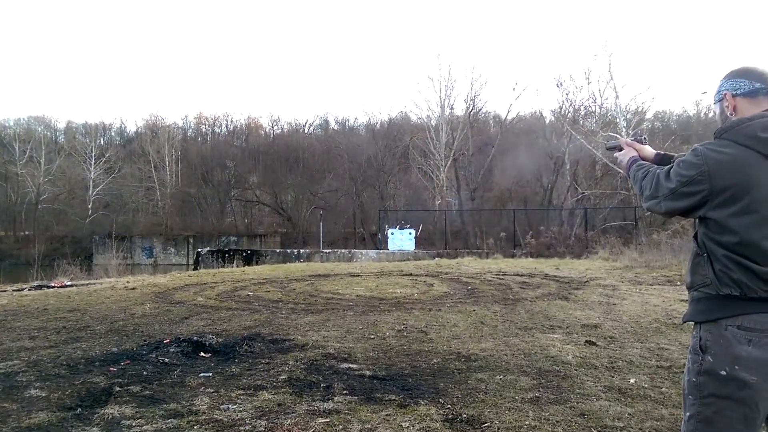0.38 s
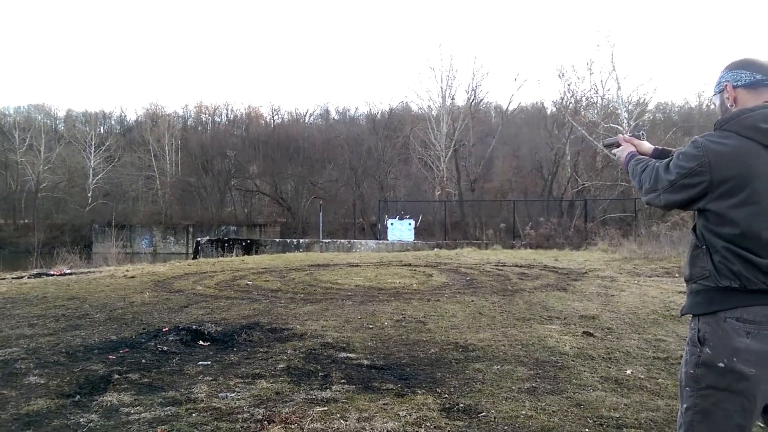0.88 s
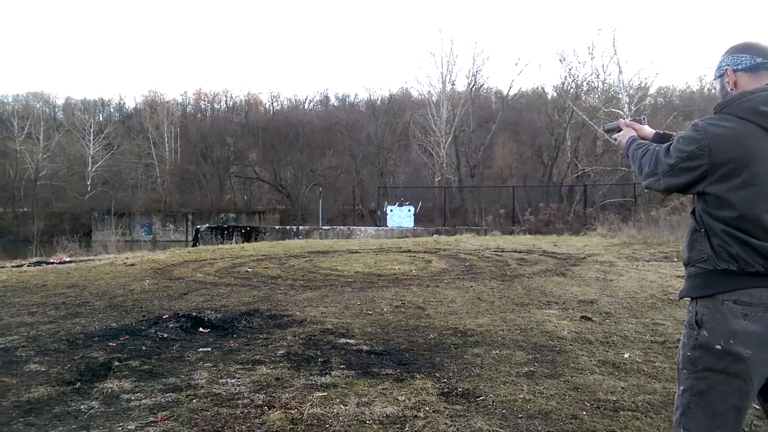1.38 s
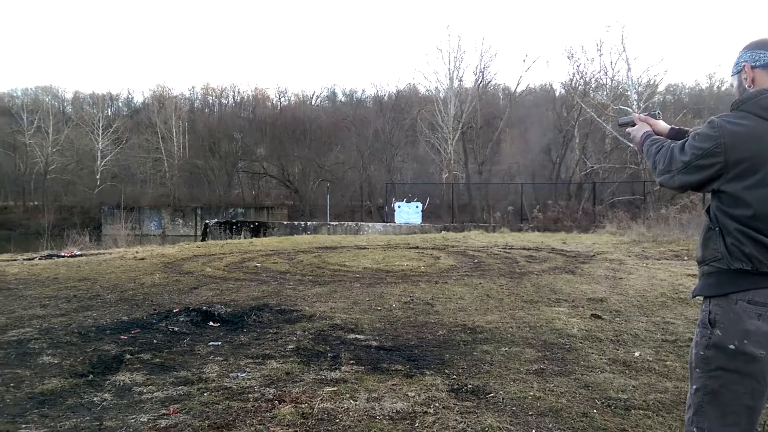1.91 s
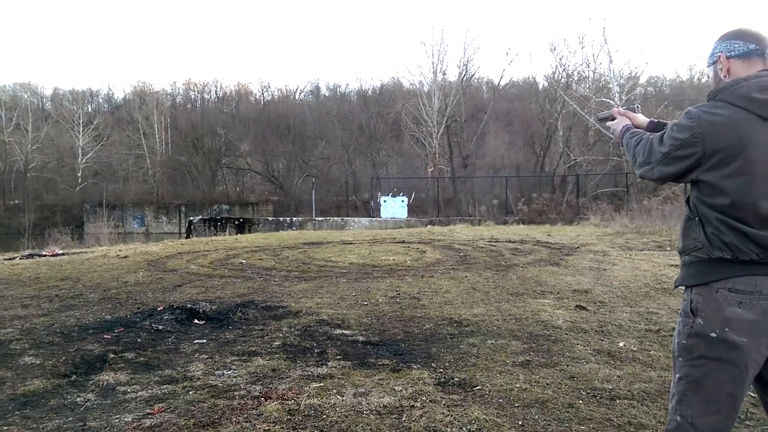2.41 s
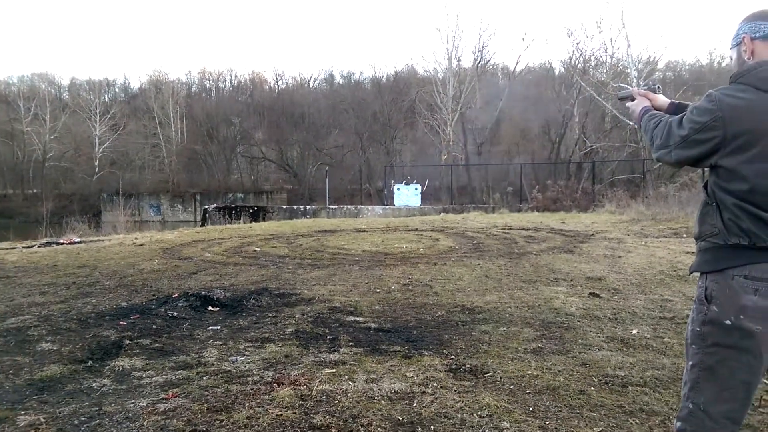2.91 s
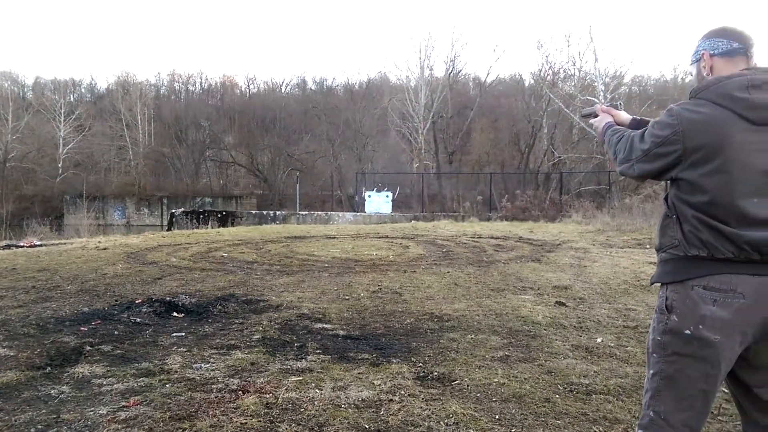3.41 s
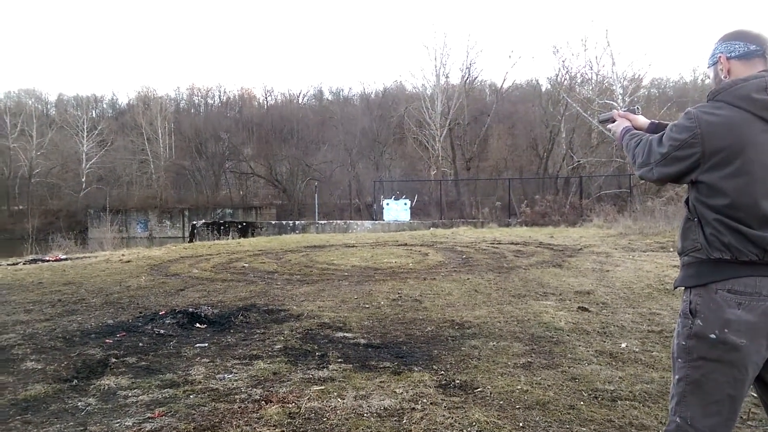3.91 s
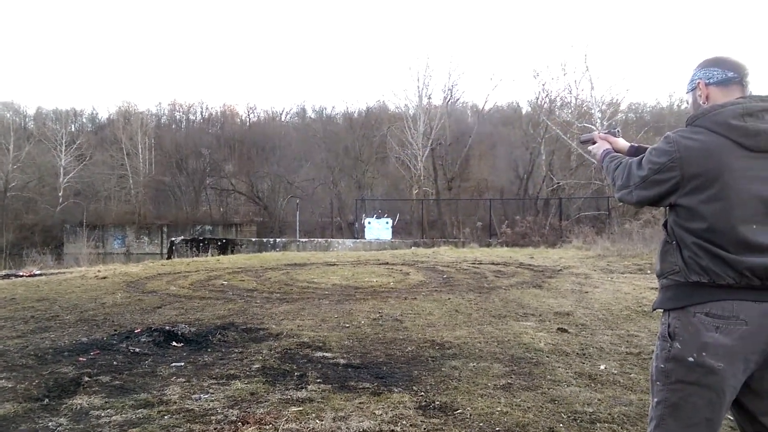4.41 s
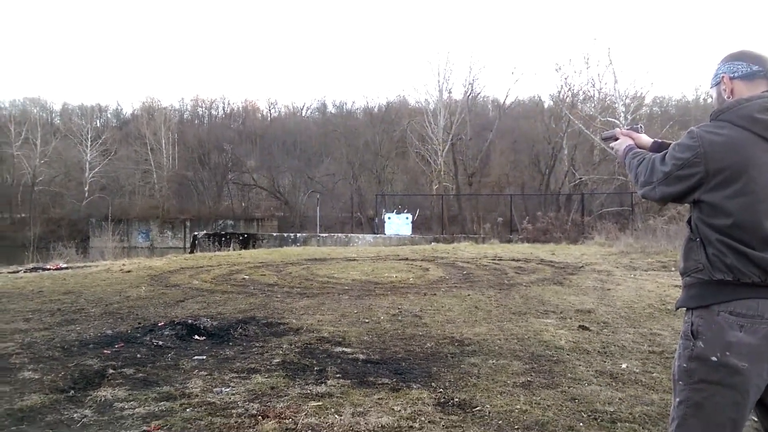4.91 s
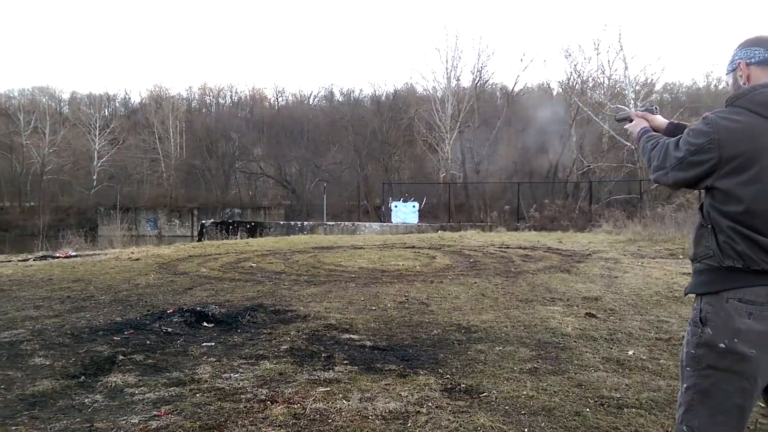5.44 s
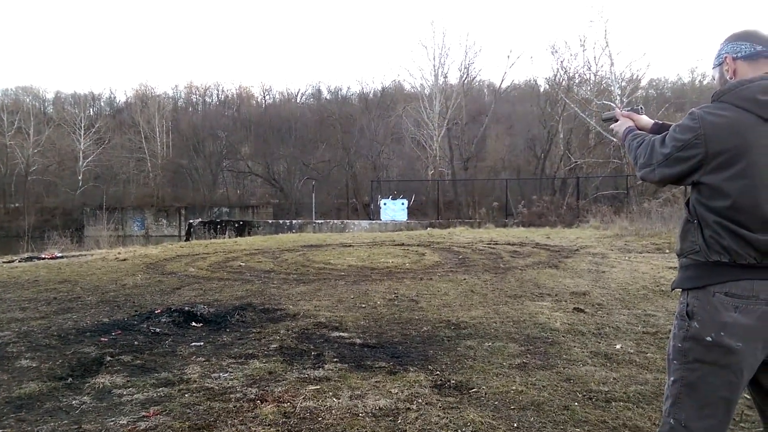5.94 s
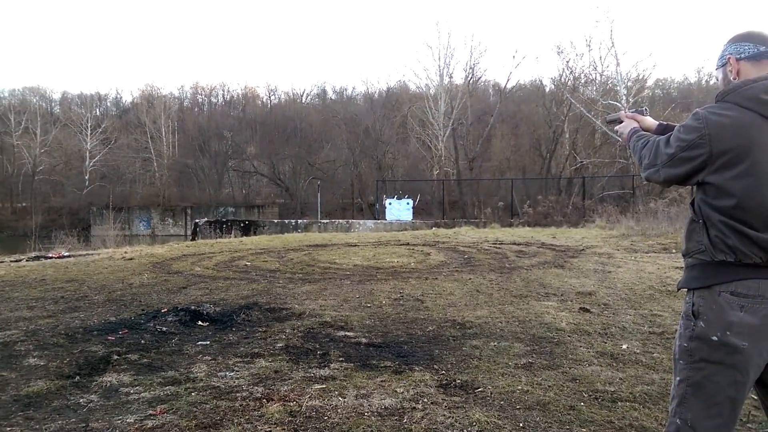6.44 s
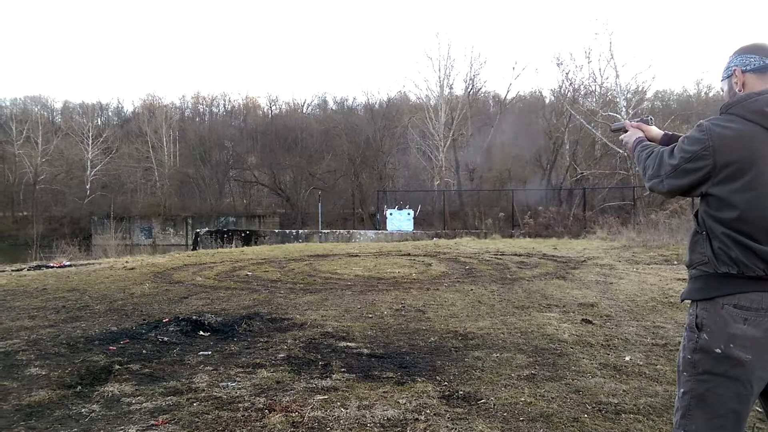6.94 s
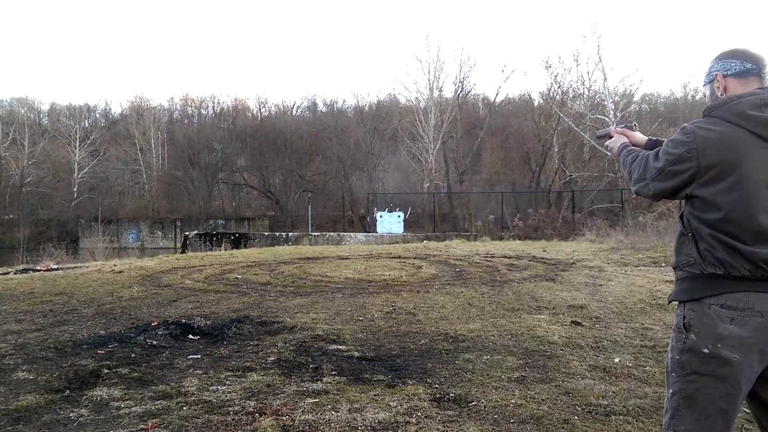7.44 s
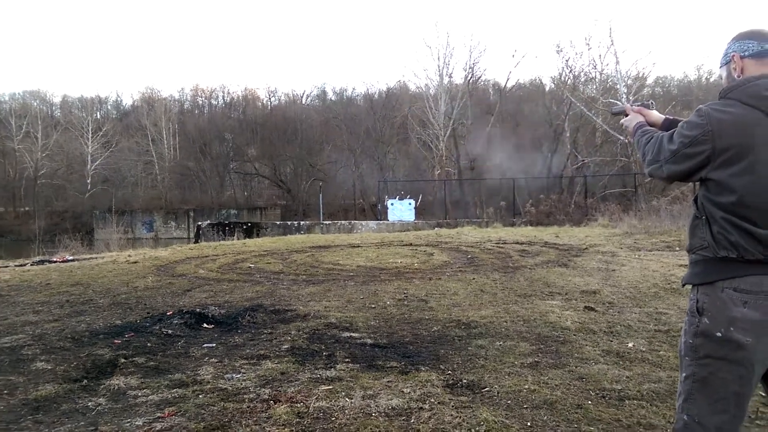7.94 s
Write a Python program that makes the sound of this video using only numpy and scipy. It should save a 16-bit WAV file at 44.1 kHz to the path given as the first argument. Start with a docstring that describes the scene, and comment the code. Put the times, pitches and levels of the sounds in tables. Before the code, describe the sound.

Seven evenly spaced handgun shots crack over a grassy field, each with sharp slapback echoes and a fading tree-line wash, above a low engine throb.

```python
"""A small engine throbs to the left over the rustle of an open field, and a handgun's parts faintly ring and click.
Then come seven shots, each a pressure jump with boom and rattle that drives the microphones into overload.
Sharp slaps return from sheds, fence and banks, within a wash scattered by ground and trees that loses its treble.
Struck metal rings, cases knock and clink as they land, and dull thumps come from the ground.
The gain control ducks under each blast, then climbs back so that the throb swells again."""
import sys
import numpy as np
from scipy import signal
from scipy.io import wavfile

SR = 44100
rng = np.random.default_rng(int(sys.argv[2]) if len(sys.argv) > 2 else 0)


def file_out(sig):
    """Save sig as 16-bit WAV at sys.argv[1]."""
    # one column per channel
    cols = np.atleast_2d(sig).T
    # limit, then scale
    lim = np.clip(cols, -1, 1)
    pcm = np.round(lim * 32767).astype(np.int16)
    wavfile.write(sys.argv[1], SR, pcm)


def invert_db(level):
    """Linear amplitude ratio for a level in decibels (20 dB per decade), elementwise."""
    return 10 ** (np.asarray(level, dtype=float) / 20)


N = 356328   # samples

BAND_EDGES_HZ = 33 * 2 ** np.arange(0, 9.6, .5)
BANDS_HZ = list(zip(BAND_EDGES_HZ, BAND_EDGES_HZ[1:]))   # half-octave bands: low, high


def at_hz(points, hz):
    """Spectral interpolation: a curve is read on a log-frequency axis."""
    points_hz, values = np.transpose(points)
    return np.interp(np.log(hz), np.log(points_hz), values)


def band(x, low_hz, high_hz):
    """Band limitation: a Butterworth filter passes one range of frequencies."""
    edges = np.clip([low_hz, high_hz], 10, .45 * SR)
    return signal.sosfilt(signal.butter(2, edges, "band", fs=SR, output="sos"), x + 1e-18)


def drift(rate_hz):
    """Random modulation: straight lines join random knots of unit spread."""
    knots = rng.standard_normal(int(rate_hz * N / SR) + 2)
    return np.interp(np.arange(N) * rate_hz / SR, np.arange(len(knots)), knots)


def ring(clicks, hz, t60_s):
    """Damped resonance: a unit click starts a decaying sine of initial height 1."""
    r = invert_db(-60 / (t60_s * SR))
    w = 2 * np.pi * hz / SR
    return signal.lfilter([0, np.sin(w)], [1, -2 * r * np.cos(w), r * r], clicks + 1e-18)


def add(out, x, start_s):
    """Superposition: x is summed into out from its start on."""
    i = min(round(start_s * SR), N)
    out[:, i:i + x.shape[-1]] += x[..., :N - i]


# likeness of left and right in the sound field: pitch_hz, likeness (0 to 1)
CHANNEL_LIKENESS = [(60, 0.37), (130, 0.95), (300, 1), (700, 0.067), (1500, 0.71), (4000, 0.033),
                    (9000, 0.024)]


def stereo(pair, hz):
    """Spatial coherence: sum and difference of two noises set how alike the channels are."""
    alike = np.clip(at_hz(CHANNEL_LIKENESS, hz), 0, 1)
    return np.sqrt(.5 + .5 * alike) * pair[0] + np.sqrt(.5 - .5 * alike) * pair[1] * [[1], [-1]]


FAR_LAG, NEAR_LAG = 16, 11   # samples by which right trails left; near: the blast and its slaps


def from_left(x, lag=FAR_LAG):
    """Interaural-style time difference: the right channel hears the sound late."""
    return np.array([x[0], np.roll(x[1], lag)])


def puff(hz, level_db, pan_db, t60_s, octaves):
    """Impulsive noise: a decaying burst, steeply limited to some octaves either side of hz."""
    t = np.arange(4000) / SR
    burst = rng.standard_normal((2, len(t))) * invert_db(-60 * t / t60_s)
    low, high = hz / 2 ** octaves, hz * 2 ** octaves
    partly_alike = burst[0] + .5 * burst
    burst = band(band(partly_alike, low, high), low, high)
    return burst / abs(burst).max() * invert_db(level_db + np.array([[.5], [-.5]]) * pan_db)


# shots: start_s, level_db (peak of the rattle), hold_s (before its extra fade),
# bass_db (bass of the blast), metal_db (drive of the struck metal)
GUNSHOTS = [(0.1999, 17.5, 0.025, -1.5, -2.5), (1.5166, 28, 0.026, -0.5, -35),
            (2.7072, 26, 0.028, -2.5, -5), (4.0067, 27, 0.031, -1.5, -34), (5.438, 19, 0.0012, -13, -2),
            (6.6921, 25, 0.03, -2, -7.5), (7.8357, 22, 0.029, -2, -29)]
# spectrum of the rattle before the bass setting: pitch_hz, level_db (relative, per Hz)
RATTLE_COLOUR = [(150, -20), (230, -11), (320, -13), (420, -3), (550, -8), (1000, -2.5), (1600, -10),
                 (2600, -8), (4000, -14), (8000, -19), (16000, -18.5)]
# resonances left booming: pitch_hz, level_db (relative), t60_s
BOOM_MODES = [(320, -8, 0.12), (516, -9, 0.091), (800, -18, 0.037), (1000, -3, 0.077), (2460, -10, 0.037)]


def blasts():
    """Shock radiation: an N-shaped jump, ringing boom modes and a rattle of gas, slide and nearest ground."""
    out = np.zeros((2, N))
    t = np.arange(SR // 4) / SR
    jump = np.clip(1 - t / 0.0004, -1, 1) * (t < .0016)
    boom = sum(invert_db(db) * ring(t == 0, hz, t60_s) for hz, db, t60_s in BOOM_MODES)
    for start_s, level_db, hold_s, bass_db, _ in GUNSHOTS:
        extra_t60_s = 2.2 * hold_s
        # a steady fade of 606 dB per s, joined after the hold by the extra one
        fade_db = -60 * np.maximum(t - hold_s, 0) / extra_t60_s - 606 * t
        noise = rng.standard_normal((2, 2, len(t))) * invert_db(fade_db)
        rattle = 0
        for k, (low, high) in enumerate(BANDS_HZ[4:]):
            colour_db = at_hz(RATTLE_COLOUR, low * 1.194) + bass_db / (1 + (low / 1500) ** 2)
            pair = stereo(noise[k % 2], low / 2.5)   # near, so more alike
            rattle = rattle + invert_db(colour_db) * band(pair, low, high)
        blast = rattle / abs(rattle).max() + invert_db(-21.5) * jump + invert_db(2 * bass_db - 11) * boom
        add(out, from_left(invert_db(level_db) * blast, NEAR_LAG), start_s)
    return out


# single reflectors: delay_s, level_db (peak before panning), pitch_hz (centre), pan_db (left minus right)
REFLECTORS = [(.056, 6.5, 800, -10.5), (.0673, 5, 2700, -13), (.1455, -3, 330, -2.5), (0.1459, 3, 1490, -1),
              (.194, -8, 800, 3), (.21, -14.5, 885, 5), (.2322, -5, 880, -9), (.2464, -4, 890, 0.5),
              (.285, -6.5, 730, -5), (.298, -16, 835, -2), (.4413, -16.5, 2270, -8), (.5664, -16, 700, 0.5),
              (.7004, -20, 2620, 2)]


def slaps():
    """Specular reflection: sheds, fence and banks return one pattern of bursts, varying a little in level."""
    out = np.zeros((2, N))
    # a hard face throws the sharpest slap, which flutters twice more, drifting left
    flutter = [(.1045 + k * .0082, 19 - k * 9.5, 2970, 7 + k * 9) for k in range(3)]
    for delay_s, level_db, hz, pan_db in flutter + REFLECTORS:
        # 11.4 cycles of decay; far reflectors are wide and rough, adding .17 s per s past .15 s
        t60_s = 11.4 / hz + .17 * max(delay_s - .15, 0)
        octaves = .55 + np.exp(-delay_s / .2)   # far slaps are narrower in band
        slap = from_left(puff(hz, level_db, pan_db, t60_s, octaves), NEAR_LAG)
        for start_s, *_ in GUNSHOTS:
            add(out, slap * invert_db(rng.normal(0, 1.5)), start_s + delay_s)
    return out


# wash from ground and trees, nearest first: delay_s, level_db (relative),
# pan_db (left minus right, in the treble)
SCATTER = [(0, -12, 0), (.035, -7.5, 3), (.058, -0.5, -9), (.078, -6, -8), (.1, -0.5, -0.5),
           (.1435, -15.5, -23), (.146, -0.5, 1.5), (.2, -12.5, -10), (.25, -11.5, -5), (.42, -19, -8),
           (.57, -19.5, 1.5), (.64, -24, 1.5), (.86, -23, -1), (1.6, -44, -4)]
# spectrum of the wash: pitch_hz, level_db (relative, per Hz)
SCATTER_COLOUR = [(88, -43.5), (150, -8.5), (254, -13), (321, -11.5), (637, -4), (998, 1), (1260, -6),
                  (2140, -6), (4760, -11), (5360, -18.5), (6770, -26), (14500, -23), (16000, -22.5)]
# absorption along the path: pitch_hz, loss_db_per_s
AIR_ABSORPTION = [(200, -10.5), (700, 0.5), (2500, 0.5), (4500, 24.5), (7000, 90), (11000, 54),
                  (16000, 115)]


def wash():
    """Diffuse scattering: countless trunks return a mostly repeated pattern, its treble absorbed by the air."""
    same, grain_db, roll_db = .75, 2.0, 1.7   # power share repeated; clumping; unevenness within each band
    delay_s = np.arange(round(SCATTER[-1][0] * SR)) / SR
    points_s, points_db, points_pan_db = np.transpose(SCATTER)
    level_db = np.interp(delay_s, points_s, points_db)
    pan_db = np.interp(delay_s, points_s, points_pan_db)
    clumps = invert_db(grain_db * drift(150)[:len(delay_s)])
    trunks = rng.standard_normal((2, 2, len(delay_s)))
    leaves = rng.standard_normal((len(GUNSHOTS), 2, 2, len(delay_s)))   # the air shifts between shots
    echoes = clumps * (np.sqrt(same) * trunks + np.sqrt(1 - same) * leaves)
    out = 0
    for k, (low, high) in enumerate(BANDS_HZ[4:]):
        hz = np.sqrt(low * high)
        scattered = np.zeros((2, N))
        shade = np.clip(np.log2(hz / 500) / 2.35, 0, 1)   # the housing shades only short waves
        gain_db = level_db - 35 + at_hz(SCATTER_COLOUR, hz) - at_hz(AIR_ABSORPTION, hz) * (delay_s - .2)
        gain_db = gain_db + roll_db * drift(24.67)[:len(delay_s)]
        gain = invert_db(gain_db + np.array([[.5], [-.5]]) * shade * pan_db) * np.sqrt(SR / 2)
        for (start_s, *_), echo in zip(GUNSHOTS, echoes):
            add(scattered, gain * stereo(echo[k % 2], hz), start_s)
        out = out + band(scattered, low, high)
    return from_left(out)


# modes of the metal: pitch_hz, level_db (relative to the drive), t60_s
METAL_MODES = [(2200, -18, .8), (3570, -14, .6), (5200, -16, .5), (5350, -17, .45)]


def struck_metal():
    """Modal vibration: metal downrange rings .155 s after each shot, and the air makes it waver."""
    hits = np.zeros((1, N))
    for start_s, *_, metal_db in GUNSHOTS:
        add(hits, np.array([[invert_db(metal_db)]]), start_s + .155)
    return sum(invert_db(db) * (.4 + drift(160)) * ring(hits, hz, t60_s) for hz, db, t60_s in METAL_MODES)


# cases knock on cloth and grass: start_s, level_db (peak before panning), pan_db (left minus right)
CASE_KNOCKS = [(0.6624, -22.5, 11), (0.8984, -43, 2.5), (1.9116, -23, 6), (2.2159, -39, 2),
               (2.2762, -37, 1.0), (3.213, -23.5, 10), (3.4062, -34, 3.5), (4.3779, -22.5, 4),
               (5.889, -21.5, 7), (7.0595, -23, 9), (7.1965, -42, 1.0)]


def case_knocks():
    """Damped impact: each case on a soft surface makes a brief puff of treble noise."""
    out = np.zeros((2, N))
    for start_s, level_db, pan_db in CASE_KNOCKS:
        add(out, puff(9200, level_db, pan_db, t60_s=.022, octaves=1.0), start_s)
    return out


# a case strikes something hard: start_s, level_db (drive of the modes)
CASE_CLINKS = [(1.0001, -37), (1.1503, -34.5)]
# modes of a case landing end on: pitch_hz, level_db (relative to the drive), t60_s
CASE_MODES = [(10930, -1, 0.12), (11620, -4, 0.18)]


def case_clinks():
    """Modal vibration: a hard impact sets the modes of a case ringing."""
    drops = np.zeros(N)
    for start_s, level_db in CASE_CLINKS:
        drops[round(start_s * SR)] = invert_db(level_db)
    return sum(invert_db(db) * ring(drops, hz, t60_s) for hz, db, t60_s in CASE_MODES)


# dull thumps from the ground: start_s, level_db (peak)
GROUND_THUMPS = [(2.276, -9), (3.592, -22), (4.738, -9), (6.321, -33)]


def ground_thumps():
    """Damped impact: the ground answers with short, low bursts of noise."""
    out = np.zeros((2, N))
    for start_s, level_db in GROUND_THUMPS:
        add(out, puff(380, level_db, 0, t60_s=.014, octaves=1.3), start_s)
    return out


# clicks of handling the gun: start_s, level_db (peak before panning), pan_db (left minus right)
GUN_CLICKS = [(0.145, -34, 1), (1.3194, -44, 0.0), (7.814, -40, 0.0)]
# one faint ring of the gun's parts: start_s, level_db, pitch_hz, t60_s
GUN_RING = (.118, -43, 2230, .6)


def gun_handling():
    """Impact excitation: the gun's parts click as noise puffs, and one rings as a damped resonance."""
    out = np.zeros((2, N))
    for start_s, level_db, pan_db in GUN_CLICKS:
        add(out, puff(3000, level_db, pan_db, t60_s=.022, octaves=1.0), start_s)
    start_s, level_db, hz, t60_s = GUN_RING
    return out + ring(invert_db(level_db) * (np.arange(N) == round(start_s * SR)), hz, t60_s)


# wandering engine speed: start_s, speed_hz (cycles per s)
ENGINE_SPEED = [(0.0, 15.177), (1.01, 14.797), (2.02, 14.822), (3.03, 15.204), (4.04, 14.829),
                (5.05, 14.737), (6.06, 15.352), (7.07, 14.719), (8.08, 14.589)]
# exhaust orders: order (multiple of the speed), level_db (relative)
EXHAUST_ORDERS = [(1, -41), (2, -32), (3, -28), (4, -9), (5, 0), (6, -4), (7, -13), (8, -18), (9, -27),
                  (10, -24), (11, -29), (12, -18), (13, -26)]


def engine():
    """Harmonic synthesis: one firing per cycle, its orders turned in phase across the pipe resonance."""
    pipe_hz, pipe_width_hz = 67, 4.5
    speed_hz = np.interp(np.arange(N) / SR, *np.transpose(ENGINE_SPEED))
    phase = 2 * np.pi * (-.396 + np.cumsum(speed_hz) / SR)
    throb = 0
    for order, level_db in EXHAUST_ORDERS:
        lead = np.arctan((order * speed_hz.mean() - pipe_hz) / pipe_width_hz)
        height = invert_db(level_db + .8 * drift(5))
        throb = throb - height * np.cos(order * phase + lead + .12 * drift(4))
    # an order at 0 dB gets -26 dB rms, then the left is raised and the right lowered by .6 dB
    return from_left(np.sqrt(2) * invert_db(-26) * throb * invert_db([[.6], [-.6]]), lag=15)


# spectrum of the field: pitch_hz, level_db (relative, per Hz)
FIELD_COLOUR = [(25, -30), (60, 10), (120, -5.5), (250, -3), (500, -15), (950, -5.5), (1500, -10),
                (2400, -26.5), (4200, -27), (7000, -33.5), (12500, -35), (16000, -23.5)]
# faint narrow hiss: pitch_hz (centre), width_hz, level_db (rms)
NARROW_HISS = [(5200, 360, -58), (12600, 500, -70)]


def field():
    """Broadband noise: band-shaped rustle of the engine, air and microphone hiss, with narrow bands added."""
    out = 0
    noise = rng.standard_normal((2, 2, N))
    for k, (low, high) in enumerate(BANDS_HZ):
        hz = np.sqrt(low * high)
        gain = invert_db(at_hz(FIELD_COLOUR, hz) + 0.65 * drift(8.2))
        out = out + gain * band(stereo(noise[k % 2], hz), low, high)
    out = invert_db(-35.5) * out / band(out, 146.3, 17000).std()   # rms level within that band
    for hz, width_hz, level_db in NARROW_HISS:
        hiss = band(noise[0], hz - width_hz / 2, hz + width_hz / 2)
        out = out + invert_db(level_db) * hiss / hiss.std()
    return from_left(out)


def scene():
    """Linear superposition: all sources and reflections add as pressures."""
    shots = blasts() + slaps() + wash()
    small_sounds = struck_metal() + case_knocks() + case_clinks() + ground_thumps() + gun_handling()
    return shots + small_sounds + engine() + field()


def gain_control(x, knee_db, release_db_per_s, attack_s):
    """Dynamic compression: peaks over the knee pull the gain down with a lag; it climbs back steadily."""
    over_db = np.maximum(20 * np.log10(abs(x).max(axis=0) + 1e-9) - knee_db, 0)
    ramp_db = release_db_per_s * np.arange(N) / SR
    held_db = np.maximum.accumulate(over_db + ramp_db) - ramp_db
    r = np.exp(-1 / (attack_s * SR))
    return x * invert_db(-signal.lfilter([1 - r], [1, -r], held_db))


def top_cut(x):
    """Nothing passes above the cut-off."""
    return signal.sosfilt(signal.butter(12, 16460, fs=SR, output="sos"), x)


def record(dry):
    """Transducer saturation: capsules overload, gain ducks, peaks are squashed, the top is dulled and cut."""
    dull = signal.lfilter(*signal.butter(2, 11000, fs=SR), dry[0])
    x = np.array([0.7 * dull + 0.29 * dry[0], dry[1]])   # the left port is duller
    x = invert_db(19) * np.tanh(x / invert_db(18.5))
    x = gain_control(x, knee_db=-3, release_db_per_s=193, attack_s=0.0099)
    x = 0.66 * np.tanh(x / 0.82)
    x = signal.lfilter(*signal.butter(1, 9000, fs=SR), x)
    x = signal.sosfilt(signal.cheby2(10, 50, 16500, fs=SR, output="sos"), x)
    return top_cut(x)


dry = scene()
out = record(dry)
file_out(out)
```